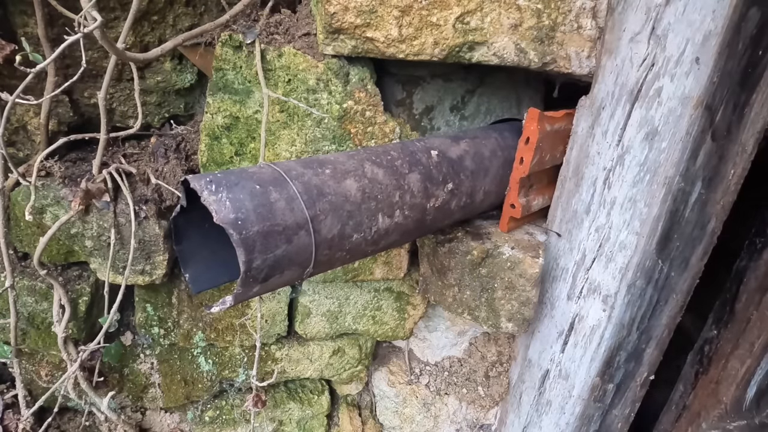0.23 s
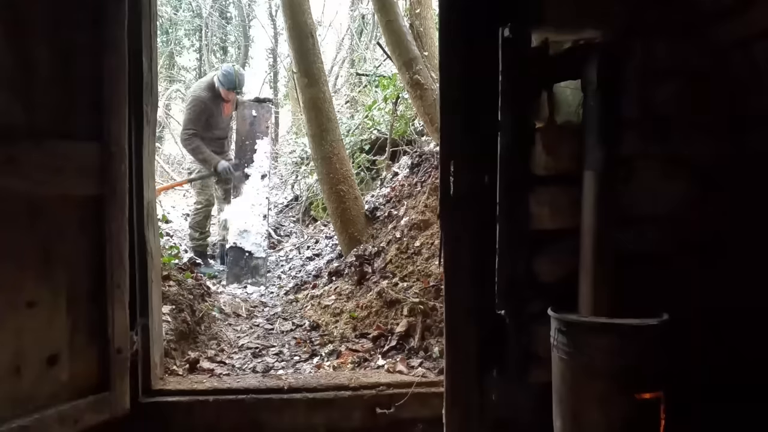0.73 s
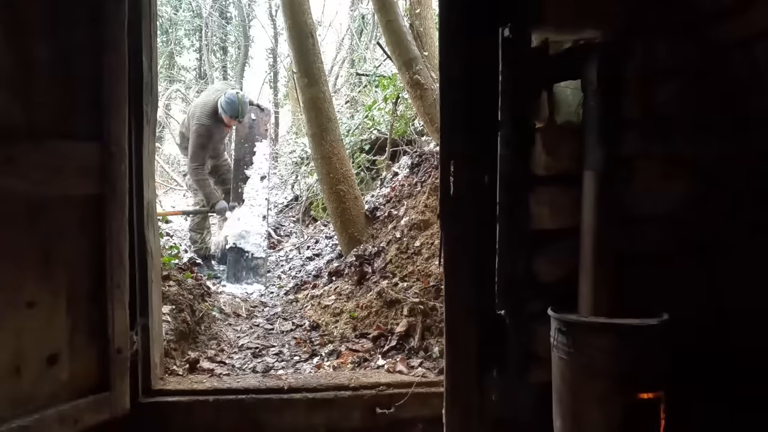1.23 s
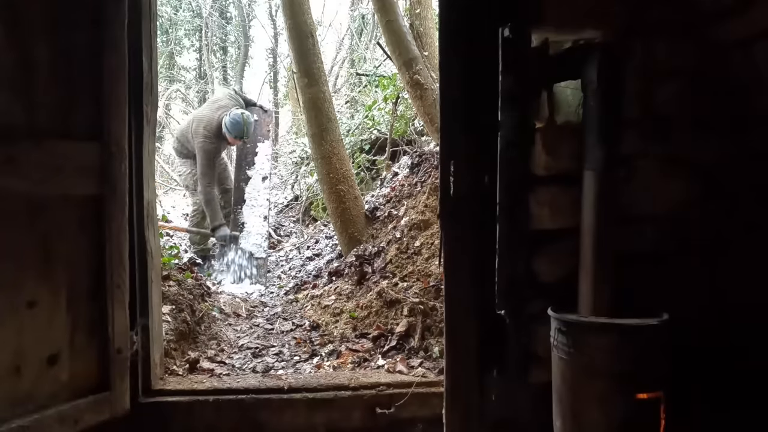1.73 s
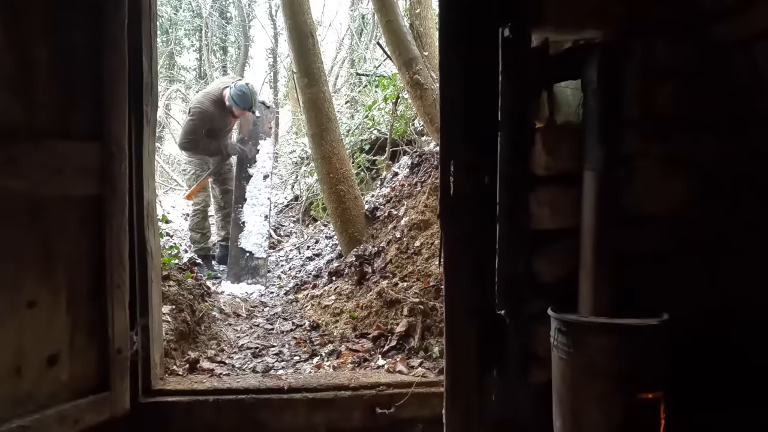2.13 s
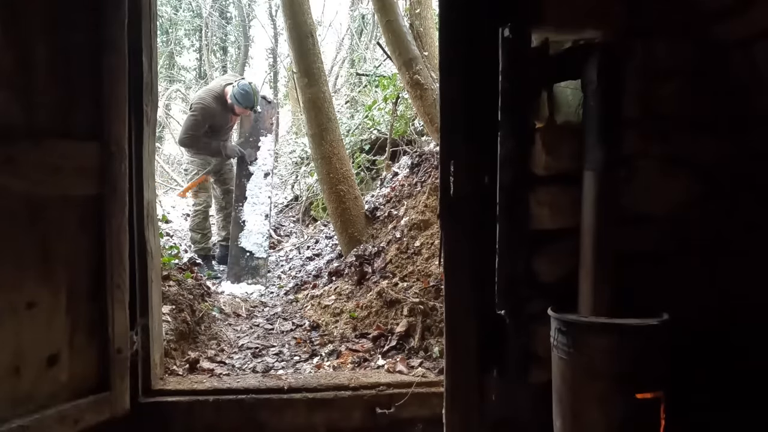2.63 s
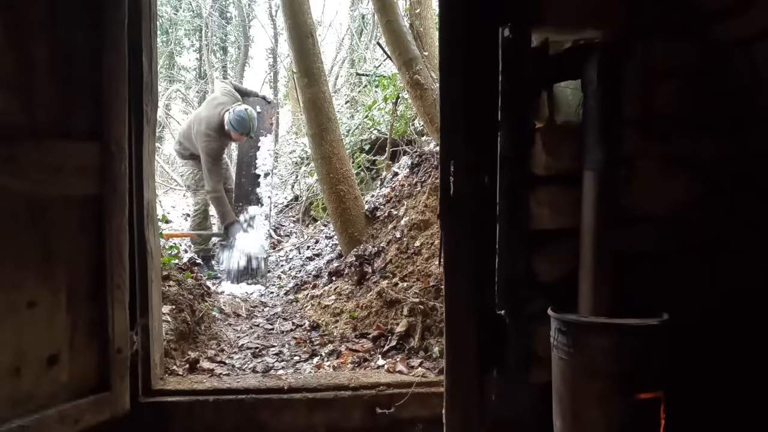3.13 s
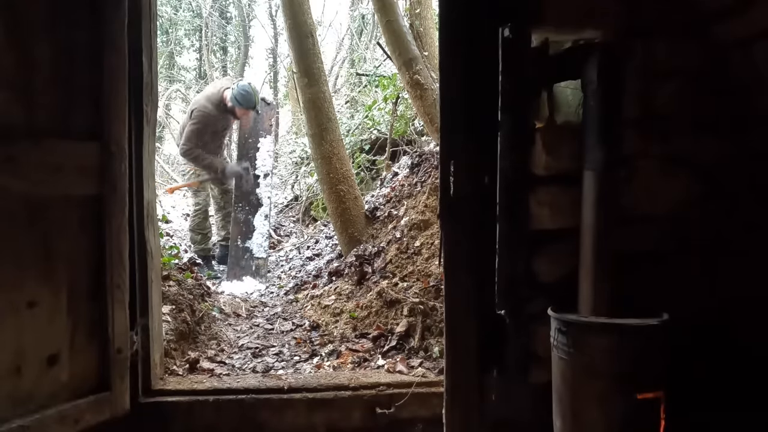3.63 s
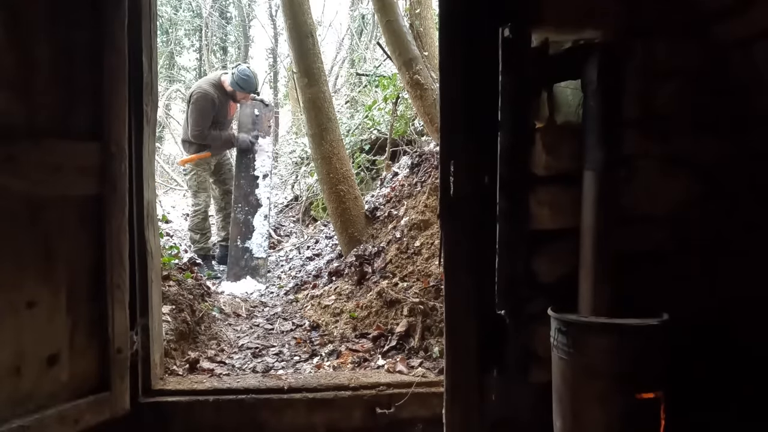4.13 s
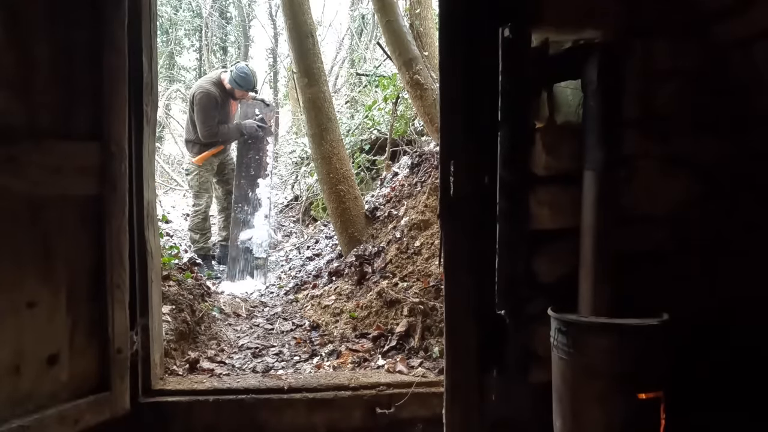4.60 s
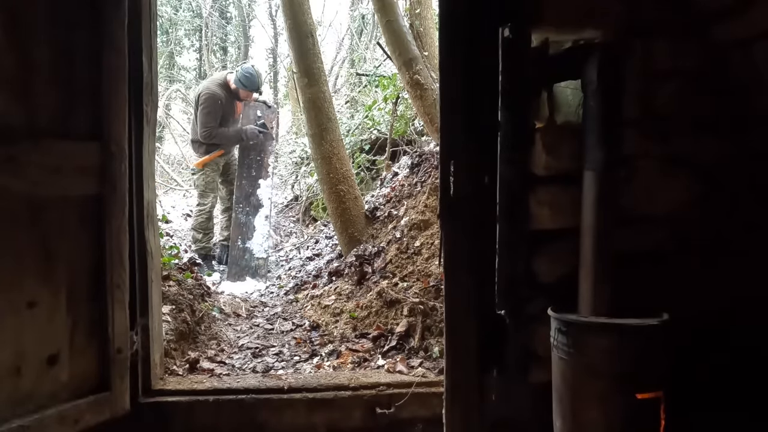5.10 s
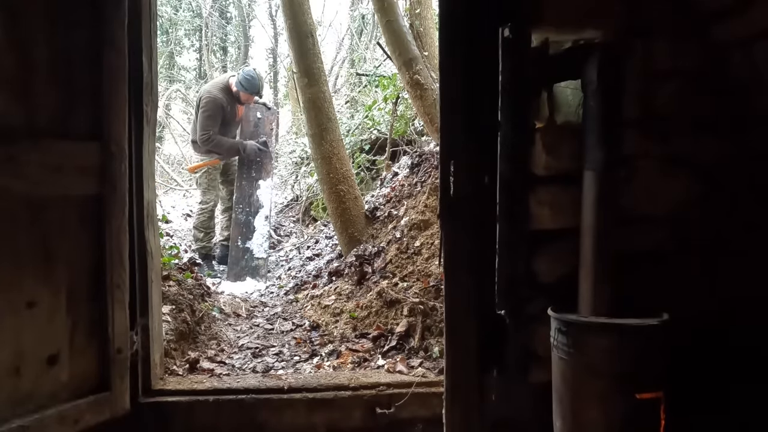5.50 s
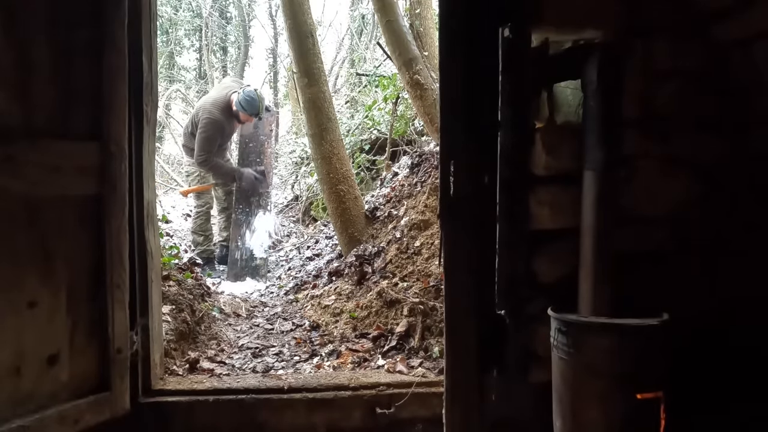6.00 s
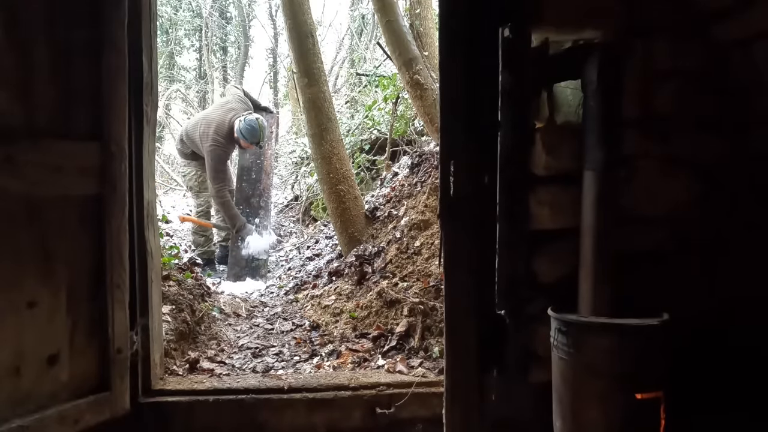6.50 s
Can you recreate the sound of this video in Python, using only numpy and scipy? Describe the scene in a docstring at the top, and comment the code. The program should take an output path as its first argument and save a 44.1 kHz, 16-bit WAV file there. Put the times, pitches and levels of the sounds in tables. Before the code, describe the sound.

A shovel scrapes and crunches through crusted icy snow in quick uneven strokes, with snapping crust, loose crumbs hissing down and a low outdoor rumble.

```python
"""Shovel scraping crusted snow

A person scrapes crusted snow in quick strokes, heard through the doorway of a small stone shed.
Each stroke bites, swells and fades as a stream of tiny fractures filtered by the blade's modes.
Pieces of crust snap as stepped bursts, loose snow hisses down, the tool knocks and briefly squeaks.
Low band noise makes air buffeting and a wavering outdoor rumble, over a faint hiss from the woods."""
import sys
import numpy as np
from scipy import signal
from scipy.fft import rfft, irfft
from scipy.io import wavfile
from scipy.ndimage import uniform_filter1d

SR = 44100
rng = np.random.default_rng(int(sys.argv[2]) if len(sys.argv) > 2 else 0)


def transcribe(u):
    """Save the signal u as a 16-bit wav file named by the first command-line argument.

    u: samples, shape (n,) or (channels, n), limited to [-1, 1]; the rate is SR.
    q: integer samples, one column per channel.
    """
    v = np.clip(np.atleast_2d(u).T, -1, 1)
    q = np.round(v * 32767).astype(np.int16)
    wavfile.write(sys.argv[1], SR, q)


N = 297675
TIME = np.arange(N) / SR
TAPS = 8192  # length of filters and short sounds
AGE = np.arange(TAPS) / SR
BINS = np.fft.rfftfreq(TAPS, 1 / SR)
BINS_ALL = np.fft.rfftfreq(N, 1 / SR)


def amp(db):
    """Decibels to gain."""
    return 10 ** (np.asarray(db) / 20)


def unit(x):
    """Scales to an rms of one."""
    return x / np.sqrt(np.mean(x ** 2) + 1e-20)


def read(points, hz):
    """Interpolates a spectrum on a log-frequency axis."""
    f, value = np.transpose(points)
    return np.interp(np.log(hz + 1), np.log(f + 1), value)


def add(mix, start_s, sound):
    """Mixes a sound in at a time."""
    part = mix[max(round(start_s * SR), 0):][:len(sound)]
    part += sound[:len(part)]


def band(hz, low_hz, high_hz, order=6):
    """Gain of a smooth band-pass."""
    below = 1 + (low_hz / (hz + 1)) ** (2 * order)
    above = 1 + (hz / high_hz) ** (2 * order)
    return (below * above) ** -.5


def causal(gain):
    """Minimum-phase impulse response of unit energy with this gain shape."""
    log_gain = np.log(np.maximum(gain / gain.max(), 1e-5))
    full = np.concatenate([log_gain, log_gain[-2:0:-1]])
    response = np.fft.ifft(np.exp(np.conj(signal.hilbert(full)))).real
    return response / np.linalg.norm(response)


def noise(gain):
    """Steady noise of unit rms, shaped by a function of frequency."""
    return unit(irfft(rfft(rng.standard_normal(N)) * gain(BINS_ALL), N))


def effort():
    """Strength of push, rasp and grit: strokes approach, bite, swell as snow piles up and fade; snow spills."""
    # Strokes of the shovel. Each row: start in s, approach (30 dB climb) in s, swell in s, hold in s,
    # nominal 30 dB fade in s, rasp drive in dB, nominal swell depth in dB, push over rasp in dB,
    # grit over rasp in dB.
    strokes = [ (0.481, .006, .12, 0.097, 0.12, -39, 14.5, -.5, -3),
               (0.774, .07, 0.062, 0.054, .11, -45, 1.3, -6, -4),
               (0.955, 0.094, 0.019, 0.045, 0.21, -46.5, 1, -5, 1.6),
               (1.112, .31, .066, .054, 0.08, -32, 10, 2, -4),
               (1.353, .17, 0.0098, 0.013, 0.27, -44, 5.5, 0.5, 0.5),
               (1.512, .17, .17, .003, 0.12, -38, 16.5, 3.5, -1),
               (2.769, .036, .23, .18, 0.1335, -32.5, 4, -1.5, -3),
               (4.163, 0.22, .075, .02, 0.1362, -29.5, 14, -5, -5),
               (4.709, 0.081, .04, .12, 0.0856, -31.5, 8.5, -3, -3.5),
               (5.275, 0.013, .05, .078, 0.0941, -31, 4, -2, -7.5),
               (5.713, 0.21, .11, .058, 0.13, -29.5, 11.5, -3.5, -4.5),
               (6.166, .018, 0.032, 0.034, 0.24, -48, 7, -6, 4.5),
               (6.315, .14, 0.076, .14, 0.1443, -29.5, 6, -3.5, -5)]
    # Blade catching on hard crust. Each row: centre in s, surge in dB.
    catches = [(0.626, 2.5), (1.24, 3), (1.671, 6), (2.905, 4.0), (3.044, 4.5), (3.137, 2.5), (3.184, 7),
               (4.249, 5), (4.777, 4), (4.832, 7), (4.87, 3), (5.346, 9), (5.416, 4.5), (5.793, 2.3),
               (5.848, 5.5), (5.96, 11.5), (6.438, 3.9), (6.578, 9)]
    # Loose snow sliding and trickling. Each row: start in s, rise in s, 30 dB fade in s (negative: keeps
    # growing), fine crumb drive in dB, coarse pieces over crumbs in dB.
    spills = [(-0.096, 0.27, .15, -56, -1), (0.321, .045, 0.1, -68, -9), (1.818, .03, 0.23, -50.5, -6.5),
              (1.914, 0.013, 0.22, -58, -13), (3.199, .14, .38, -44.5, 0), (3.514, .01, 0.03, -53.5, 7.5),
              (3.64, 0.019, 0.14, -50, -7.5), (4.287, .073, .57, -55, -7.6), (4.41, 0.083, 0.95, -53.5, -9),
              (4.586, 0.014, 0.25, -43, -8), (4.898, .033, 1.1, -59.5, -9), (5.14, .07, 0.46, -49.5, -10),
              (5.982, .12, 0.6, -58.5, -19), (6.666, .07, -2, -49, -11)]
    # Onset of push, rasp and grit as the blade enters the crust, in s.
    bite_s = [.016, 0.0043, .007]
    # Push, rasp and grit while the blade slides over loose snow, in dB against the bite.
    approach_db = [-4.5, -11, -11.5]
    # Factors of push, rasp and grit on the swell depth.
    swell_share = [1.28, 0.93, 0.94]
    # Factors of push, rasp and grit on the fade time.
    fade_stretch = [1.16, 1.03, 0.97]
    catch_s = .015  # surge dB falls to a quarter this far from its centre
    spill_push_db = -7.5  # falling snow hardly stirs the low modes

    clock = TIME[::32]
    power = np.zeros((3, len(clock)))
    per_layer = np.array([bite_s, approach_db, swell_share, fade_stretch])[:, :, None]
    bite, slide_db, share, stretch = per_layer
    for start_s, approach, swell, hold, fade, db, swell_db, push_db, grit_db in strokes:
        t = clock - start_s
        sliding = amp(slide_db + 30 * np.minimum(t, 0) / approach)
        contact = np.maximum(np.clip(t / bite, 0, 1), sliding)
        piling_db = -swell_db * share * np.clip(1 - t / swell, 0, 1)
        fading_db = -30 * np.maximum(t - swell - hold, 0) / (fade * stretch)
        balance = amp([[push_db], [0], [grit_db]])
        power += (contact * amp(db + piling_db + fading_db) * balance) ** 2
    surge_db = sum(db / (1 + ((clock - s) / catch_s) ** 2) ** 2 for s, db in catches)
    power *= amp(surge_db) ** 2
    for start_s, rise, fade, db, coarse_db in spills:
        t = clock - start_s
        shape = np.clip(t / rise, 0, 1) * amp(-30 * np.maximum(t - rise, 0) / fade)
        balance = amp([[coarse_db + spill_push_db], [coarse_db], [0]])
        power += (shape * amp(db) * balance) ** 2
    return np.array([np.interp(TIME, clock, np.sqrt(layer)) for layer in power])


def scrape(force):
    """Push rings the low modes, the edge rasps in the middle, fine grit fizzes on top."""
    # Colour of loose crumbs. Each row: frequency in Hz, relative level in dB per Hz.
    crumb_colour = [(880, -37), (1500, 8), (2750, -8), (3850, 1), (7350, -0.5), (8250, -5.5),
                    (12100, -10.5), (14000, -20), (15000, -31)]
    push_force, rasp_force, grit_force = force
    slips = noise(lambda hz: band(hz, 5.2, 120, order=2))
    # hard contact rings the blade, loose crumbs hiss by themselves
    bite = grit_force / (grit_force + amp(-48.5))
    colour = blade(ring_db=7)
    push = amp(-2.0) * push_force * fractures(per_s=1500, spread_db=2.0, clumps_db=0.57 * slips)
    rasp = amp(-3.5) * rasp_force * fractures(per_s=3500, spread_db=2.5, clumps_db=2.0 * slips)
    grit = amp(-3.0) * grit_force * np.sqrt(bite)
    grit = grit * fractures(per_s=9000, spread_db=5.5, clumps_db=1.8 * slips)
    crumbs = amp(-0.96) * grit_force * np.sqrt(1 - bite)
    crumbs = crumbs * fractures(per_s=6000, spread_db=2.5, clumps_db=0.37 * slips)
    layers = [(push, colour * band(BINS, 100, 653)),
              (rasp, colour * band(BINS, 662, 2455)),
              (grit, colour * band(BINS, 2260, SR / 2)),
              (crumbs, amp(read(crumb_colour, BINS)) * band(BINS, 1770, SR / 2))]
    crunch = sum(signal.oaconvolve(drive, causal(gain))[:N] for drive, gain in layers)
    return crunch + amp(-6.5) * grit_force * bite * chips(per_s=330, spread_db=4.0, cycles=1.6)


def blade(ring_db):
    """Gain of the shovel: broad crunch colour with resonant modes standing out of it."""
    # Modes of blade and handle. Each row: frequency in Hz, relative level in dB, t60 in s.
    modes = [(174, -14, 0.12), (251, -8, 0.16), (331.9, 0, 0.2), (385, -3.5, 0.15), (467, -2.5, .12),
             (520.6, 2, 0.082), (629.6, 1, 0.2), (703, 0, 0.27), (787, -4.5, 0.086), (884, -3, 0.29),
             (938, 0, 0.069), (1044, -1.5, 0.048), (1153, -7, 0.039), (1214, -4, 0.052), (1311, 1, 0.14),
             (1440, -2, 0.04), (1942, -2.5, 0.045), (2940, 3, 0.18), (3166, -11.5, 0.082),
             (3915, -1.5, 0.047), (7700, 2.5, 0.0073), (11230, -1, .03)]
    # Broad colour of the crunch. Each row: frequency in Hz, relative level in dB per Hz.
    crunch_colour = [(100, -1.5), (230, -8), (310, 0.5), (410, -8), (500, -4.5), (680, -10.5), (950, -5.5),
                     (1250, -6.5), (1550, -12), (4000, -9.5), (7500, -15.5), (8300, -24.5), (11500, -23.5),
                     (14500, -40)]
    peaks = 0
    for mode_hz, db, t60_s in modes:
        detune = (BINS - mode_hz) * t60_s * 2 * np.pi / np.log(1000)
        peaks = peaks + amp(db + ring_db) ** 2 / (1 + detune ** 2)
    return amp(read(crunch_colour, BINS)) * np.sqrt(1 + peaks)


def fractures(per_s, spread_db, clumps_db):
    """Train of tiny breaks of uneven size, bunched by stick and slip; short-term level evened out."""
    size = amp(spread_db * np.minimum(rng.exponential(1, N), 4.5) + clumps_db)
    train = size * rng.choice([-1, 1], N) * (rng.random(N) < per_s / SR)
    return train / np.sqrt(abs(uniform_filter1d(train ** 2, size=1500)) + 1e-9)


def chips(per_s, spread_db, cycles, count=24):
    """Icy chips of many sizes break off, each ringing a few cycles at one of many pitches."""
    out = np.zeros(N)
    for hz in np.geomspace(1500, 9000, count) * rng.uniform(.95, 1.05, count):
        size = amp(spread_db * np.minimum(rng.exponential(1, N), 3.5))
        breaks = size * (rng.random(N) < per_s / count / SR)
        turns = hz * AGE[:TAPS // 8]
        ring = turns * np.exp(-turns / cycles) * np.sin(2 * np.pi * turns)
        out += signal.oaconvolve(breaks, ring)[:N]
    return out / np.sqrt(abs(uniform_filter1d(out ** 2, size=4000)) + 1e-9)


def wander(x):
    """The contact point moves along the edge, so patches of the spectrum swell and fade."""
    depth_db, width_hz, lasting_s = 2.5, 520, .035
    hz, t, z = signal.stft(x, SR, nperseg=512)
    field = rng.standard_normal(z.shape)
    sizes = [max(round(width_hz / hz[1]), 1), max(round(lasting_s / t[1]), 1)]
    for axis, size in enumerate(sizes):
        field = uniform_filter1d(uniform_filter1d(field, size, axis), size, axis)
    gain = amp(depth_db * unit(field) * band(hz, 550, SR, order=2)[:, None])
    return signal.istft(z * unit(gain), SR, nperseg=512)[1][:N]


def snaps():
    """A crack jumps through a piece in a few quick steps and rings it; crumbs follow."""
    # Pieces of crust snapping. Each row: start in s, peak in dB before gain_db, pitch in Hz.
    pieces = [(0.2474, -45.5, 6200), (0.354, -43, 6800), (0.4977, -27, 6080), (0.616, -21, 1900),
              (0.6352, -24, 1960), (0.679, -23, 3300), (0.7, -28, 2860), (0.834, -24.5, 2900),
              (0.866, -24, 4360), (1.117, -32.5, 4000), (1.1592, -22, 3400), (1.52, -35.5, 2330),
              (1.5524, -32, 7440), (1.5913, -27, 3020), (1.661, -18, 4200), (2.1056, -57, 6070),
              (2.4304, -54, 7000), (2.741, -41.5, 7690), (2.7769, -27, 4160), (2.8778, -23, 3900),
              (2.9023, -24, 3100), (2.9715, -14, 3800), (3.0363, -21.5, 1860), (3.112, -12.5, 4000),
              (3.1347, -13, 3180), (3.1572, -16, 4120), (3.1664, -13.5, 4780), (3.405, -33.5, 4010),
              (3.4518, -33, 3100), (4.1405, -37.5, 2850), (4.1736, -21.5, 2570), (4.1835, -20.5, 2970),
              (4.2253, -19.5, 2070), (4.244, -19, 3050), (4.2726, -15, 3600), (4.2827, -21, 3780),
              (4.742, -15.5, 2300), (4.775, -20, 2850), (4.7918, -20, 3000), (4.823, -13.5, 2930),
              (4.8598, -22, 2560), (5.07, -37.5, 5430), (5.336, -22.5, 3630), (5.782, -18.5, 2290),
              (5.84, -19.5, 2170), (6.0172, -33.5, 3960), (6.4909, -21, 2900), (6.5613, -14.5, 7400),
              (6.576, -17, 4800)]
    gain_db, ring_db, crumble_db = 1, 7, -27
    run_s, crumble_s, count = .006, 0.015, 4
    out = np.zeros(N)
    for start_s, db, hz in pieces:
        burst = amp(crumble_db) * rng.standard_normal(TAPS) * np.exp(-AGE / crumble_s)
        steps_s = np.cumsum(rng.uniform(.5, 1, count)) * run_s / count
        burst[(steps_s * SR).astype(int)] += rng.choice([-1, 1], count) / np.sqrt(1 + np.arange(count))
        resonance = 1 + amp(ring_db) / (1 + ((BINS / hz - 1) / 0.092) ** 2)
        piece = band(BINS, 0.58 * hz, 2.05 * hz, order=2) * resonance
        snap = signal.fftconvolve(burst, causal(piece * band(BINS, 900, 7500, order=4)))
        add(out, start_s, amp(db + gain_db) * snap / abs(snap).max())
    return out


def knocks():
    """Blows on the shovel grind briefly: heavy ones thud in the low modes, light ones tick in the high."""
    # Tool meeting something hard. Each row: start in s, peak in dB, low-mode weight in dB,
    # metallic treble in dB, grinding time constant in s.
    blows = [(0.136, -45, -20, -20, 0.0054), (0.585, -28.5, 3.5, -20, 0.0084), (0.866, -33, 6.5, -15, .011),
             (1.415, -34.5, 10, -23.5, 0.011), (1.72, -33, 12, -25.5, 0.015),
             (2.321, -44.5, 2.5, -19, 0.017), (2.689, -29, 5, -20, .016), (3.04, -19.5, 5.5, -23, 0.019),
             (3.952, -46.5, -19.5, 7, 0.019), (3.972, -49.5, -12.5, -20, 0.005),
             (4.027, -34.5, -35.5, -13.5, 0.0081), (4.716, -27, -8, -24, 0.012),
             (5.275, -24, 5.5, -4.5, .008), (5.612, -35.5, -18, -29, 0.0084),
             (5.719, -24, -8.5, -43, 0.027), (6.249, -30, -7, -16.5, 0.0066),
             (6.32, -27.5, -20, -20, .0062)]
    out = np.zeros(N)
    ringing = blade(ring_db=14) * band(BINS, 110, 14000)
    for start_s, db, weight_db, metal_db, grind_s in blows:
        contact_db = read([(600, weight_db), (900, -6.5), (1250, -11.5), (2900, metal_db - 4),
                           (4500, metal_db), (11000, metal_db + 5.5)], BINS)
        blow = 0.036 * rng.standard_normal(TAPS) * np.sqrt(AGE / grind_s) * np.exp(-AGE / grind_s)
        blow[0] += .3  # first impact
        knock = signal.fftconvolve(blow, causal(ringing * amp(contact_db)))
        add(out, start_s, amp(db) * knock / abs(knock).max())
    return out


def pings():
    """The blade squeaks on the crust: a quick slip, as one decaying tone of wavering pitch."""
    # Squeaks. Each row: start in s, starting amplitude in dB, mean pitch in Hz.
    squeaks = [(1.476, -35.5, 2350), (1.497, -54.5, 2220), (1.5204, -44.5, 2220), (1.9355, -47, 2305)]
    t60_s = 0.084
    out = np.zeros(N)
    for start_s, db, hz in squeaks:
        waver = noise(lambda f: band(f, 20, 300, order=2))[:TAPS]
        tone = np.sin(2 * np.pi * np.cumsum(hz * (1 + .035 * waver)) / SR)
        add(out, start_s, amp(db) * tone * np.exp(-np.log(1000) * AGE / t60_s))
    return out


def shed(x):
    """Walls answer with a short tail; side echoes widen the treble, their phase drifting randomly."""
    # Decay of the walls. Each row: frequency in Hz, t60 in s.
    wall_decay = [(150, 0.62), (600, 0.034), (2500, 0.21), (12000, 0.051)]
    # Echoes from the sides. Each row: frequency in Hz, gain in dB.
    side_gain = [(150, -38), (300, -32), (600, -12), (1200, -13.5), (2500, -12), (5000, -20.5), (8000, -18),
                 (12000, -3)]
    wet_db, drift_hz = -15, 30  # drift: rms frequency shift
    taps = rng.choice([-1., 1.], (2, 2 * TAPS)) * (rng.random((2, 2 * TAPS)) < 3000 / SR)
    hz, t, z = signal.stft(taps, SR, nperseg=256)
    decay = np.exp(-np.log(1000) * t / read(wall_decay, hz)[:, None])
    tails = signal.istft(z * decay, SR, nperseg=256)[1]
    tails[1] *= np.exp(-np.arange(tails.shape[1]) / SR / 0.041)  # the door frame's echoes die sooner
    shared, side = (signal.oaconvolve(x, tail / np.linalg.norm(tail))[:N] for tail in tails)
    side = irfft(rfft(side) * amp(read(side_gain, BINS_ALL)), N)
    phase = 2 * np.pi * np.cumsum(drift_hz * noise(lambda f: band(f, 2.01, 40, order=2))) / SR
    side = (signal.hilbert(side) * np.exp(1j * phase)).real
    return x + amp(wet_db) * shared + np.array([side, -side])


def outdoors(push):
    """Air buffets below a rumble that swells as the blade shakes the ground; faint hiss from the woods."""
    # Low background. Each row: time in s, air buffeting under 60 Hz in dB,
    # rumble in dB before drift and shaking.
    lows = [(0, -43.5, -57), (.44, -49, -60.5), (.6, -50, -51.5), (1.35, -45.5, -45), (1.75, -55, -52.5),
            (2.2, -50, -49.5), (2.6, -53, -49.5), (3.1, -45.5, -48), (3.6, -53.5, -54.5),
            (4.2, -43.5, -51.5), (4.65, -54, -53), (5.2, -42, -54), (5.7, -50, -49.5), (6.4, -48, -45.5),
            (6.75, -38.5, -47)]
    # Rumble colour before its band-pass. Each row: frequency in Hz, relative level in dB per Hz.
    rumble_colour = [(50, -12.5), (75, 3.5), (92, -6), (135, 0), (175, -4), (215, -7), (260, -25.5),
                     (330, -32), (500, -53.5)]
    # Hiss colour. Each row: frequency in Hz, relative level in dB per Hz.
    hiss_colour = [(250, 7.5), (500, -8), (900, -13.5), (1300, -7), (2000, -12), (3000, -20.5), (6000, -17),
                   (10000, -21.5), (13000, -26), (15000, -42.5)]
    drift_db = 1.67  # rms wavering of the rumble
    shake_db, shake_law = -19.5, 0.62  # ground shakes less than in proportion to the push
    hiss_db = -69.5  # each of two sources, before they are cross-mixed

    s, buffet_db, rumble_db = np.transpose(lows)
    buffet = noise(lambda hz: band(hz, 40, 56) + amp(4) * band(hz, 7, 18))
    buffet = amp(np.interp(TIME, s, buffet_db)) * buffet
    drift = drift_db * noise(lambda hz: band(hz, .5, 4, order=2))
    steady = amp(np.interp(TIME, s, rumble_db) + drift)
    level = np.hypot(steady, amp(shake_db) * push ** shake_law)
    rumble = level * noise(lambda hz: amp(read(rumble_colour, hz)) * band(hz, 50, 500, order=4))
    hiss = np.array([noise(lambda hz: amp(read(hiss_colour, hz))) for ear in range(2)])
    return buffet + rumble + amp(hiss_db) * (hiss + .5 * hiss[::-1])


def scene():
    """The work outside the door, coloured by the shed, over the outdoor background."""
    force = effort()
    work = wander(scrape(force)) + snaps() + knocks() + pings()
    return shed(work) + outdoors(force[0])


def record(dry):
    """The left port hears more treble; then a low-pass limits the band."""
    # Port balance. Each row: frequency in Hz, left minus right in dB.
    left_over_right = [(200, 0.5), (3000, .3), (6000, 0.5), (10000, 3.5), (14000, 3)]
    edge_hz = 14300
    tilt_db = read(left_over_right, BINS_ALL) * np.array([[.5], [-.5]])
    ports = irfft(rfft(dry) * amp(tilt_db), N)
    low_pass = signal.firwin(255, edge_hz, window=("kaiser", 8), fs=SR)
    return signal.oaconvolve(ports, low_pass[None], "same")


dry = scene()
out = record(dry)
transcribe(out)
```